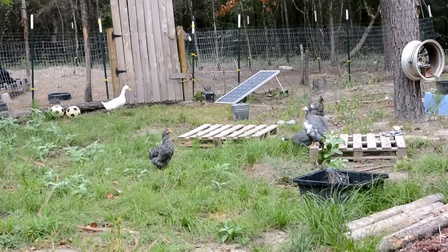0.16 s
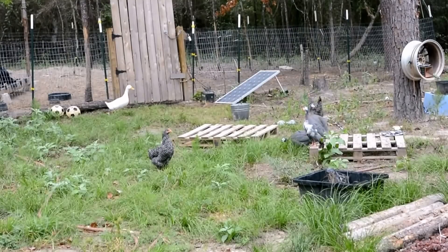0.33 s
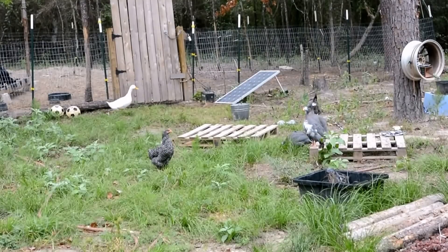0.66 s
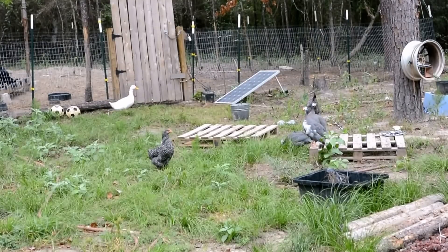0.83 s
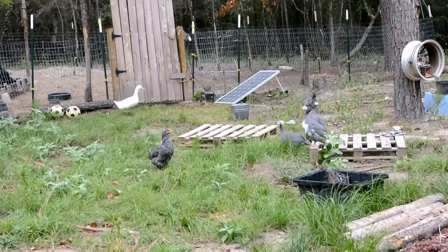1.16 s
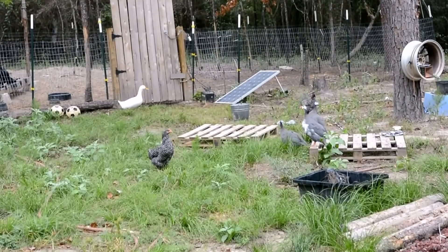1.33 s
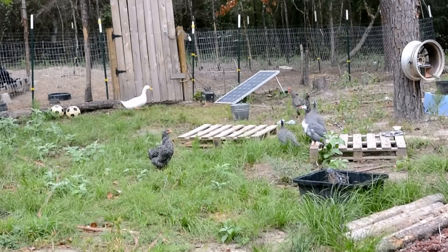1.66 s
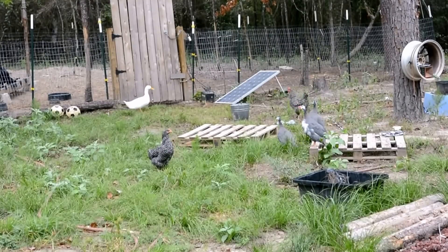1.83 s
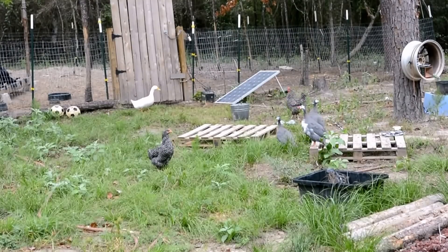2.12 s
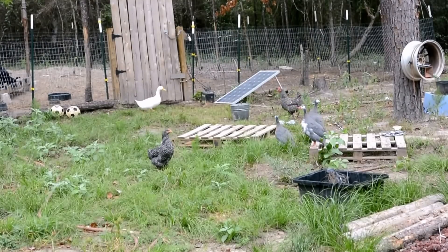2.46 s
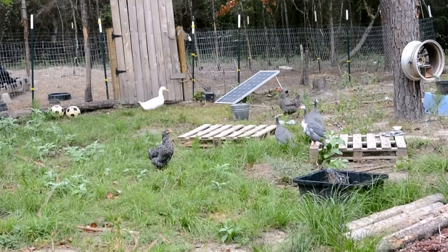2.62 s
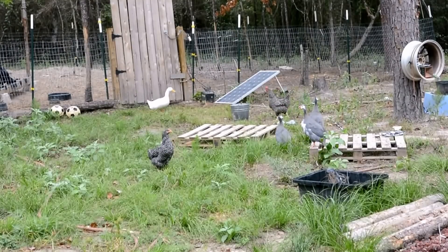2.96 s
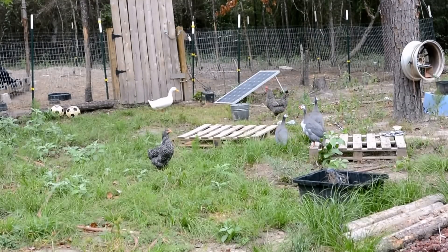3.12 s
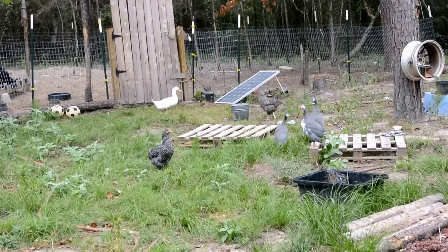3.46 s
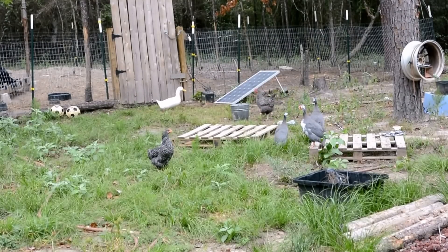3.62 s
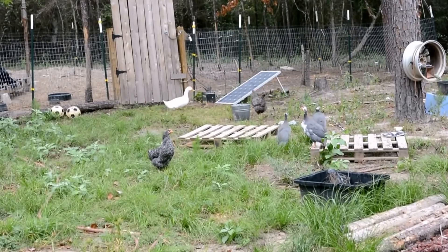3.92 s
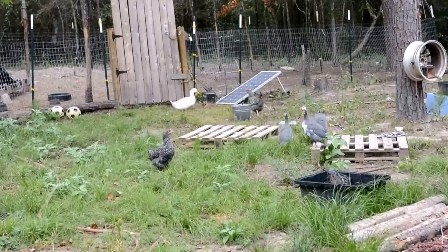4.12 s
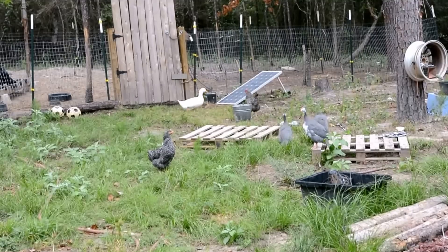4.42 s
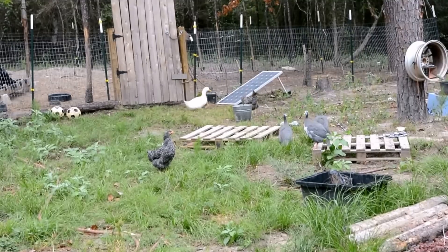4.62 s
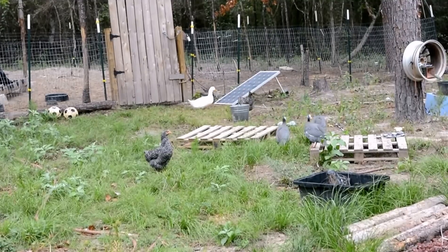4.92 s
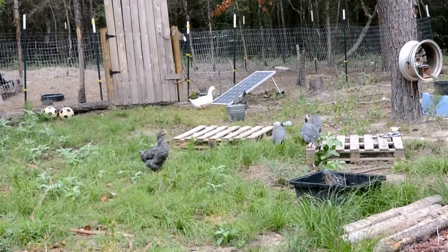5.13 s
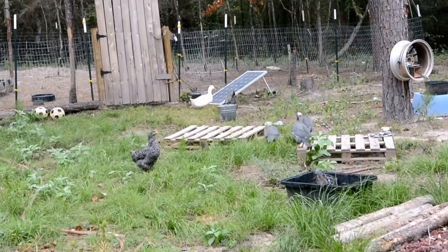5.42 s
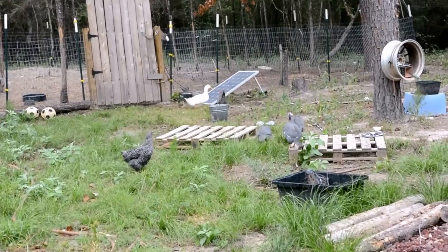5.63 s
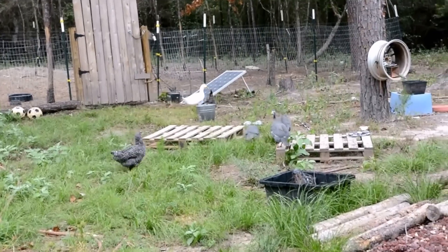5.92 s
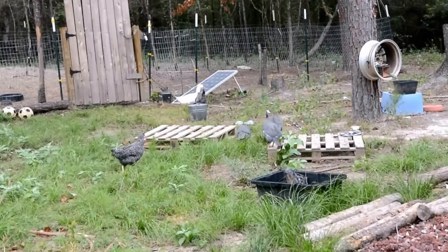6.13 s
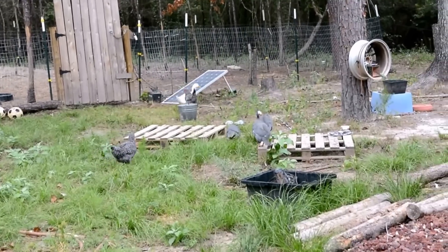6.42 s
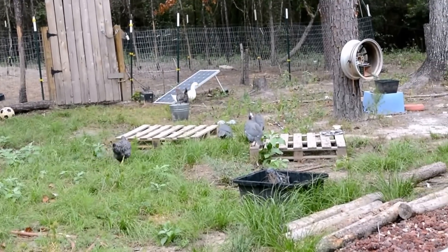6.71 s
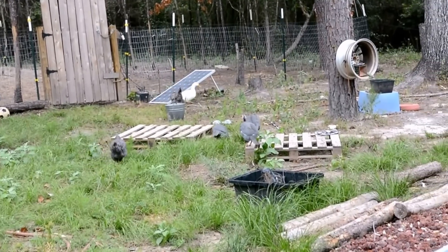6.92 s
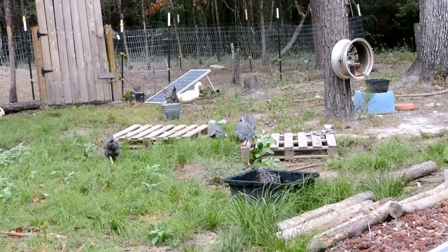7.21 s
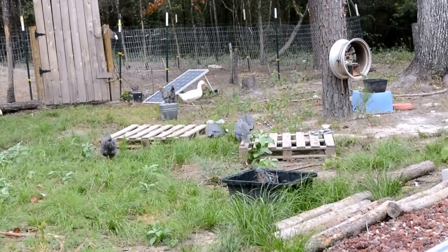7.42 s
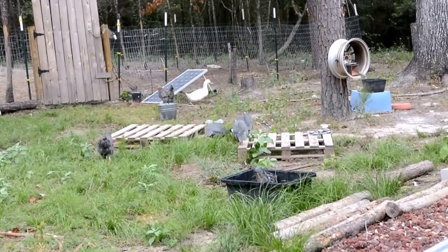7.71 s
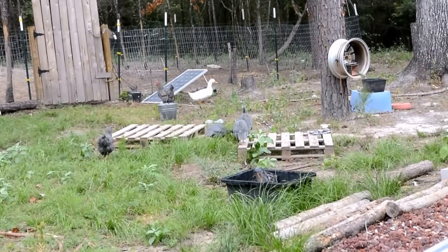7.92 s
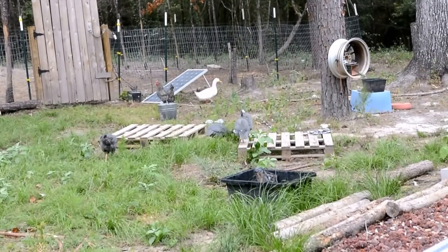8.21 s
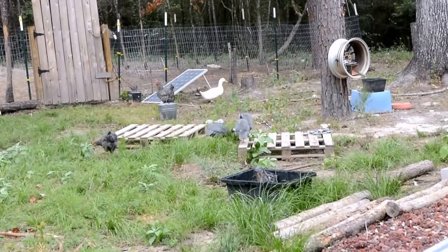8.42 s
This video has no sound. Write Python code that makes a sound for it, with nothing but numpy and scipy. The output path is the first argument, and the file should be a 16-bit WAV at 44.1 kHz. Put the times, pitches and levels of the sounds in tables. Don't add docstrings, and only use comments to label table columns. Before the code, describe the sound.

Close raindrops click and knock unevenly against a thin surface, one strong thud near one second and another at five. Behind them lie gentle patter, faint hiss and occasional high chirps. In the second half a few guinea fowl call from the middle distance: single clipped honks first, then a quick raspy run with squeaky breaks and overlapping replies, ringing briefly among trees. Afterwards the rain continues alone.

```python
import sys
import numpy as np
from scipy import signal
from scipy.fft import rfft, irfft, next_fast_len
from scipy.io import wavfile
from scipy.ndimage import uniform_filter1d

SR = 44100
rng = np.random.default_rng(int(sys.argv[2]) if len(sys.argv) > 2 else 0)


def transcribe(u):
    v = np.clip(np.atleast_2d(u).T, -1, 1)
    q = np.round(v * 32767).astype(np.int16)
    wavfile.write(sys.argv[1], SR, q)


def invert_db(level):
    return 10 ** (np.asarray(level, dtype=float) / 20)


N = 377937
FFT_SIZE = next_fast_len(N + SR)

# start_s, length_s, pitch_hz, level_db
BOOMS = [
    (0.691, 0.063, 574, -45),
    (.93, 0.11, 178, -54),
    (1.243, 0.072, 567, -44),
    (1.32, 0.18, 105, -53),
    (6.285, 0.32, 105, -59.5),
]
# time_s, level_db
WIND = [
    (0.0, -65),
    (7.23, -65),
    (8.09, -57.5),
    (8.57, -57),
]
# freq_hz, density_db
HISS_SPECTRUM = [(29, -44), (50, -20), (85, -11.5), (223, -8), (371, -7.5), (746, 3.5), (822, 1.5),
                 (973, 2.5), (1400, -3.5), (2950, -5), (5670, -13.5), (10400, -11.5), (14900, -18.5),
                 (16000, -5.5)]
# freq_hz, density_db
SIDE_SPECTRUM = [(15, -31), (25, 22), (87, -4.5), (242, -3), (575, -3), (1940, -8), (2690, -7),
                 (13600, -18), (16000, -10)]
# time_s, level_db
PATTER_LEVEL = [(0.0, -51), (0.5, -52.5), (0.97, -49), (1.81, -58), (2.6, -56.5), (3.5, -49.5),
                (4.5, -50.5), (5.5, -43.5), (6.59, -76), (7.3, -53), (8.57, -49.5)]
# start_s, peak_db, ring_hz
THUDS = [(.159, -29.5, 890), (.448, -26, 1650), (.899, -7, 850), (.928, -32, 1190), (1.244, -24, 663),
         (1.414, -21.5, 840), (1.573, -20.5, 1030), (2.061, -30, 751), (2.072, -25, 705),
         (3.341, -32, 2070), (3.392, -24, 980), (3.52, -23, 1100), (3.579, -23.5, 1170), (4.382, -28, 844),
         (4.518, -50, 750), (4.637, -26.5, 1000), (5.038, -12, 890), (5.289, -25.5, 680),
         (5.353, -20, 1040), (5.439, -23, 900), (5.648, -18.5, 1060), (5.851, -20, 990), (6.577, -20, 1170),
         (6.991, -25, 1130), (7.146, -26, 745), (7.307, -22, 1024), (7.596, -30, 1190), (7.674, -19, 1330),
         (7.998, -26.5, 1340), (8.291, -28.5, 1060)]
# start_s, peak_db, ring_hz
TAPS = [(.197, -22.5, 1310), (.608, -22, 890), (.638, -28, 1110), (.905, -24, 1010), (.956, -29.5, 606),
        (1.126, -27.5, 960), (1.17, -26.5, 1210), (1.439, -30, 991), (1.495, -28, 746), (2.072, -28, 1640),
        (.799, -27, 860), (2.744, -22, 795), (2.974, -28, 1020), (3.141, -22.5, 1670), (3.177, -27.5, 1310),
        (3.409, -31.5, 789), (3.632, -27, 1230), (3.995, -17, 810), (4.468, -28, 826), (4.816, -26, 850),
        (4.851, -33, 740), (5.49, -34.5, 1010), (5.752, -24.5, 704), (7.362, -25, 945),
        (7.797, -26.5, 1150), (7.929, -15, 910), (8.263, -37, 969), (8.344, -46, 1020), (8.453, -26.5, 940),
        (.219, -27.5, 696)]
# start_s, peak_db, ring_hz
TICKS = [(.119, -29.5, 654), (.345, -27, 680), (.617, -33, 1500), (.683, -30, 553), (.806, -25, 1300),
         (1.029, -25.5, 1020), (1.069, -32, 775), (1.771, -33.5, 760), (2.408, -32, 1790),
         (2.827, -32.5, 800), (2.897, -24, 657), (3.039, -32, 1140), (3.115, -30, 1000), (3.129, -28, 670),
         (3.241, -22, 800), (3.341, -30, 1990), (3.491, -36, 750), (4.027, -21, 980), (4.178, -29.5, 791),
         (6.148, -26.5, 820), (6.738, -46, 1060), (7.589, -29, 1510), (7.74, -30, 1300),
         (8.083, -27.5, 832), (8.229, -31, 1140), (8.384, -21.5, 821)]
# start_s, peak_db, ring_hz
LIGHT_EARLY = [(0.0276, -36, 1090), (0.0633, -33, 1000), (0.0987, -24, 1160), (0.1715, -36, 1000),
               (0.2327, -19, 990), (0.2444, -21, 1060), (0.2867, -26, 1420), (0.32, -27, 1140),
               (0.3985, -31, 1070), (0.4335, -24, 1200), (0.5382, -33, 1070), (0.674, -16, 1290),
               (0.7856, -33, 1020), (0.8404, -33, 1030), (0.878, -19, 1020), (0.9717, -21, 1040),
               (0.9844, -32, 1060), (1.0014, -27, 1110), (1.133, -23, 1950), (1.2052, -31, 1160),
               (1.31, -31, 1200), (1.4855, -18, 3810), (1.6154, -33, 1000), (1.6412, -31, 1340),
               (1.6721, -35, 1170), (1.697, -33, 1460), (1.7524, -31, 1030), (1.8075, -28, 1000),
               (1.8467, -24, 2620), (1.8993, -26, 1160), (1.9244, -31, 1010), (1.955, -25, 1140),
               (1.9644, -34, 1000), (1.9844, -32, 1080), (2.0984, -32, 1050), (2.1415, -21, 1850),
               (2.2064, -24, 1140), (2.2298, -23.5, 1000), (2.2544, -36, 2300), (2.2714, -34, 1010),
               (2.3226, -31, 1000), (2.4204, -31, 1340), (2.4304, -26, 1730), (2.4584, -37, 1070),
               (2.6104, -35, 1140), (2.6264, -27, 1000), (2.6404, -37, 1700), (2.738, -19, 1090),
               (2.7714, -34, 1830), (2.7911, -33, 1060), (3.019, -29, 2720), (3.1622, -29, 1260),
               (3.269, -20, 1010), (3.331, -23, 1010), (3.4444, -35, 1010), (3.5898, -19, 1300),
               (3.6526, -28, 1050), (3.6754, -28, 1210)]
# start_s, peak_db, ring_hz
LIGHT_LATE = [(3.862, -23, 1090), (3.967, -21, 923), (4.196, -24, 972), (4.331, -35, 864),
              (4.417, -30, 694), (4.568, -35, 813), (4.647, -30, 1180), (4.706, -26, 988),
              (4.895, -26, 891), (5.015, -16, 1140), (5.066, -25, 1290), (5.084, -36, 764),
              (5.244, -35, 1200), (5.609, -34, 816), (5.715, -31, 1410), (5.938, -31, 1430),
              (6.227, -17.5, 1070), (6.837, -23, 875), (7.026, -21, 1440), (7.19, -30, 1080),
              (7.349, -31, 891), (7.43, -31, 1250), (7.468, -25, 958), (7.563, -41, 641),
              (7.647, -25, 1370), (7.76, -41, 1140), (7.868, -29, 875), (8.019, -40, 1200),
              (8.019, -25, 856), (8.127, -25, 993), (8.201, -36, 1190), (8.4, -25, 1250),
              (8.412, -38, 1530), (8.41, -18, 724), (8.474, -29, 810), (8.552, -38, 689)]
# freq_hz, t60_s
WOOD_T60 = [(1000, 0.4), (2100, 0.66), (3000, 0.85), (5000, 0.99), (12000, 0.49)]
# start_s, length_s, start_hz, end_hz, level_db
CHIRPS = [(.09, 0.019, 8500, 8800, -57), (0.144, 0.042, 8700, 8700, -53), (0.201, 0.036, 6870, 8560, -33.5),
          (0.303, 0.041, 6500, 8370, -48), (1.47, 0.045, 3510, 3920, -41.5), (1.691, 0.05, 6300, 8420, -47),
          (2.159, 0.038, 6400, 8920, -36), (2.859, 0.031, 2700, 4040, -48.5),
          (2.913, 0.036, 6400, 8000, -49), (2.788, 0.026, 7450, 7150, -56), (2.966, 0.025, 7300, 7550, -55),
          (3.036, 0.026, 2586, 3570, -40.5), (3.041, .03, 3027, 4350, -48), (3.249, 0.023, 7450, 8750, -46),
          (4.552, 0.024, 2575, 3900, -38), (6.324, 0.045, 6600, 8900, -38), (7.312, 0.035, 6410, 7700, -53),
          (7.413, 0.021, 6650, 7600, -53), (7.88, 0.038, 8300, 9100, -55), (8.063, 0.045, 6540, 8900, -37)]
NOTES = { "clear": [(3.803, 0.037, -26.5, 980, 1), (4.02, 0.045, -18.5, 991.7, -6.5),
         (4.21, 0.055, -16.5, 987, 0.5), (4.732, 0.048, -20, 1003, 2), (5.136, 0.062, -17, 1001, -4)],
         "harsh": [(5.306, 0.071, -17, 1044, 2), (5.49, 0.074, -16, 1047, 4),
         (5.666, 0.083, -15.5, 1045, 6.5), (5.857, 0.078, -15, 1050, 10.5), (6.006, 0.069, -13, 1034, 3.5)],
         "breaking": [(4.957, 0.068, -24, 999, 1)], "falling": [(6.243, 0.079, -16.5, 1064, 3.5)],
         "sliding": [(6.47, 0.088, -15.5, 1074, 2)], "hoarse": [(6.733, 0.089, -17, 1055, 17),
         (6.947, 0.079, -19, 1056, 13)], "trailing": [(5.197, 0.047, -28, 1017, 6.5),
         (6.07, .055, -25, 1007, 4)], "answer": [(6.16, 0.05, -27, 1167, -2),
         (6.362, 0.045, -21.5, 1188, 0), (6.564, 0.0475, -22.5, 1060, 21)], }
VOICING = {"clear": (0.0084, 55, 0.38, 0.016, 0.025), "harsh": (0.0078, 10, 0.29, 1.5, 0.043),
           "hoarse": (0.0077, 45, 1, 1.13, 0.034), "falling": (0.02, 5.4, 0.12, 1.1, 0.167),
           "sliding": (0.027, 16, 0.47, 0.99, 0.095), "breaking": (0.015, 16, 0.82, 0.37, 0.037),
           "trailing": (.003, 0.47, 0.68, 1.32, 0.026), "answer": (0.022, 26, 0.85, 2, 0.068)}
CHAOS = {"clear": .21, "harsh": .45, "hoarse": .36, "falling": .24, "sliding": .3, "breaking": .62,
         "trailing": .48, "answer": .45}
CLIMB = {"clear": 0.0051, "harsh": -0.0084, "hoarse": 0.014, "falling": .04, "sliding": -0.012, "breaking":
         0.0075, "trailing": -0.017, "answer": -.03}
CORE_MULTIPLES = (1 / 3, 1, 4 / 3, 2, 8 / 3, 3, 4)
CORE_DB = {"clear": (-48, -20, -40, -28, -30, -10.5, -29.5),
           "harsh": (-37.5, -40, -15.5, -38, -31, -40, -38), "hoarse": (-56, -14, -18, -8.5, -25, -37, -42),
           "falling": (-56, -14, -40, -6.5, -26, -19, -28), "sliding": (-58, -19, -26, -9, -14, -20, -32),
           "breaking": (-48, -12, -19, -19, -20, -16, -35), "trailing": (-48, -40, -25, -32, -32, -25, -35),
           "answer": (-53, -26, -35, -8.5, -26, -20, -35)}
# freq_hz, density_db
THROAT_CLEAR = [(410, -36), (700, -17), (958, -6), (1280, 5.5), (1460, 3.5), (1920, 2.5), (2990, -2),
                (3410, -6.5), (3990, -4.5), (5540, -25.5), (7490, -21), (10700, -19.5), (16000, -50)]
# freq_hz, density_db
THROAT_MID = [(410, -77), (700, -24.5), (1640, 1), (2020, -5.5), (2160, -8.5), (2490, 1), (2960, 1.5),
              (5400, -15), (6320, -23.5), (7290, -20.5), (8760, -21), (10800, -15), (16000, -32)]
# freq_hz, density_db
THROAT_WIDE = [(190, -26), (320, -47), (897, -13.5), (1070, 0), (1190, -4), (1440, 1), (1540, -1),
               (2560, -3), (3380, -3.5), (3610, -19), (3920, -0.5), (6190, -32.5), (10300, -27),
               (16000, -49)]
# freq_hz, width_hz, clear_db, mid_db, wide_db
WINDPIPE = [(1060, 110, 8, -17.5, -4), (1444, 89, 6, 3.5, 8.5), (1650, 120, -6.5, -7, 18.5),
            (2106, 120, 14.5, 0.5, -17), (2320, 250, 6, 5, 13), (2750, 200, 14, 3.5, 0),
            (3165, 130, 9.5, -7.5, -14), (3360, 170, 15.5, 0.5, 21), (3836, 136, 11, 6.5, 3.5),
            (4690, 400, 8, 5, 1.5), (5630, 280, 12, 1.5, 14.5)]
# start_s, length_s, start_hz, level_db, second_partial_db
SQUEAKS = [(4.02, 0.015, 1566, -29.5, 1.5), (4.732, 0.0081, 1694, -31, 2), (5.843, 0.017, 3820, -26.5, -35),
           (5.864, 0.019, 1520, -20, -2), (5.14, 0.011, 1410, -41, 19.5), (5.491, 0.011, 1465, -25.5, 0),
           (5.976, 0.033, 1575, -23.5, 5), (6.024, 0.074, 1627, -26.5, -1.5),
           (6.173, 0.017, 1740, -29, 2.5), (6.368, 0.02, 1748, -26, 1), (6.462, 0.011, 1664, -30.5, 5),
           (6.472, .018, 1210, -34, 1), (6.571, 0.016, 1710, -33, 9.5)]


def rms_one(x):
    return x / np.sqrt(np.mean(x ** 2) + 1e-20)


def at_hz(points, hz):
    points_hz, value = np.transpose(points)
    return np.interp(np.log(np.maximum(hz, 1)), np.log(points_hz), value)


def level_curve(rows):
    time_s, level_db = np.transpose(rows)
    return invert_db(np.interp(np.arange(N) / SR, time_s, level_db))


def butter(x, order, hz, kind="low"):
    return signal.sosfilt(signal.butter(order, hz, kind, fs=SR, output="sos"), x)


def causal(x, db):
    cepstrum = irfft(db * np.log(10) / 20, len(x))
    cepstrum[1:len(x) // 2] *= 2
    cepstrum[len(x) // 2 + 1:] = 0
    return irfft(rfft(x) * np.exp(rfft(cepstrum)), len(x))


def coloured(spectrum):
    hz = np.arange(FFT_SIZE // 2 + 1) * SR / FFT_SIZE
    white = rfft(rng.standard_normal(FFT_SIZE))
    return irfft(white * invert_db(at_hz(spectrum, hz)), FFT_SIZE)[:N]


def add(out, start_s, piece):
    i = max(round(start_s * SR), 0)
    out[i:i + len(piece)] += piece[:N - i]


def far_rumble():
    waver = rms_one(uniform_filter1d(rng.standard_normal(N), size=3000))
    hum_hz, hum_db = 71, -67
    phase = 2 * np.pi * hum_hz * np.arange(N) / SR + 0.85 * waver[::-1]
    out = invert_db(hum_db) * (1 + 0.31 * waver) * np.sin(phase)
    for start_s, length_s, hz, db in BOOMS:
        u = np.linspace(0, 1, round(length_s * SR))
        envelope = np.sin(np.pi * u ** 0.84)
        add(out, start_s, invert_db(db) * envelope * np.sin(2 * np.pi * hz * length_s * u))
    return out


def wind():
    return rms_one(butter(rng.standard_normal(N), 2, [20, 45], "band")) * level_curve(WIND)


def insects(hz, width_hz, db):
    band = butter(rng.standard_normal(N), 2, [hz - width_hz, hz + width_hz], "band")
    return invert_db(db) * rms_one(band)


def rain_hiss():
    hiss = rms_one(coloured(HISS_SPECTRUM))
    low = butter(hiss, 2, 4500)
    patches = uniform_filter1d(uniform_filter1d(hiss[::-1] ** 2 - 1, size=900), size=900)
    lull = invert_db(1.6 * rms_one(patches))
    return invert_db(-43) * (hiss + low * (lull - 1))


def drop(ring_hz, tick_db, cycles, luck):
    t = np.arange(len(luck)) / SR
    decay = invert_db(-60 * t * ring_hz / cycles)
    swing = -np.sin(2 * np.pi * ring_hz * t + 1.69) * decay * (1 - np.exp(-t / 0.00009))
    tick = butter(luck * np.exp(-t / 0.00025) / np.std(luck[:12]), 2, 8000)
    splash = signal.lfilter([0.5], [1, -0.7], luck[::-1]) * np.exp(-t / 0.004)
    return butter(swing + invert_db(tick_db + 10) * tick + invert_db(-20.5) * splash, 2, 330, "high")


def patter(per_s, spread_db):
    gust = invert_db(3 * rms_one(uniform_filter1d(rng.standard_normal(N), size=2500)))
    size_gain = invert_db(spread_db * np.minimum(rng.exponential(1, N), 2.4))
    born = (rng.random(N) < gust * per_s / SR) * size_gain
    dealt = rng.integers(0, 14, N)
    taps = np.zeros(N)
    for k, ring_hz in enumerate(np.geomspace(560, 3200, 14)):
        one = drop(ring_hz, -17.5, 2.17, rng.standard_normal(500)) * (800 / max(ring_hz, 800)) ** 0.043
        taps += signal.fftconvolve(born * (dealt == k), one)[:N]
    return rms_one(taps) * level_curve(PATTER_LEVEL)


def near_drops():
    out = np.zeros(N)
    # table, tick_db, gain_db, ring cycles, delay_s
    groups = ((THUDS, -28, 8.5, 3.5, 0.0024), (TAPS, -18, 8.5, 3.5, 0.0024), (TICKS, -10, 8.5, 3.5, 0.0024),
              (LIGHT_EARLY, -17.5, 1.5, 2.6, 0.0014), (LIGHT_LATE, -17.5, 1.5, 2.6, 0.0014))
    for table, tick_db, gain_db, cycles, delay_s in groups:
        for start_s, db, ring_hz in table:
            piece = drop(ring_hz, tick_db, cycles, rng.standard_normal(900))
            add(out, start_s + delay_s, invert_db(db + gain_db) * piece)
    return out


def wood(x, first_s, slap_db):
    t = np.arange(SR) / SR
    response = np.zeros(SR)
    edges_hz = 300 * 2 ** np.arange(0, 6.1, 0.75)
    for low, high in zip(edges_hz, edges_hz[1:]):
        band = butter(rng.standard_normal(SR), 2, [low, high], "band")
        response += band * invert_db(-60 * t / at_hz(WOOD_T60, np.sqrt(low * high)))
    response *= np.clip(t / first_s, 0, 1) * (1 + invert_db(slap_db) * np.exp(-t / 0.021))
    return signal.fftconvolve(x, response / np.sqrt(np.sum(response ** 2)))[:N]


def whistle(length_s, start_hz, end_hz, bend, partials_db, wobble):
    u = np.linspace(0, 1, max(round(length_s * SR), 8))
    shake = 1 + wobble * uniform_filter1d(rng.standard_normal(4096), size=64)[:len(u)]
    glide = u ** bend if bend > 1 else 1 - (1 - u) ** (1 / bend)
    phase = 2 * np.pi * np.cumsum((start_hz + (end_hz - start_hz) * glide) * shake) / SR
    tone = sum(invert_db(db) * np.sin((k + 1) * phase) for k, db in enumerate(partials_db))
    return np.sqrt(2) * tone * np.sin(np.pi * u ** 1.46) ** 0.38


def small_birds():
    out = np.zeros(N)
    for start_s, length_s, start_hz, end_hz, db in CHIRPS:
        bend = 2.5 if start_hz < 3300 else 0.6
        add(out, start_s, invert_db(db) * whistle(length_s, start_hz, end_hz, bend, [0], wobble=0.1))
    return out


def syrinx_pulses(length_s, chaos, climb, pulse_hz, accent, droop):
    cycle = np.arange(140)
    jitter, offbeat, push = rng.standard_normal((3, 140))
    period = 1 + droop * np.clip((cycle / pulse_hz - length_s + 0.03616) / 0.0338, 0, 2) ** 2
    wander = rms_one(uniform_filter1d(jitter[::-1], size=14))
    period *= 1 + 0.025 * chaos * wander
    period /= 1 + climb * (cycle / pulse_hz / length_s - 0.5)
    beats = SR / pulse_hz * np.cumsum(period * (1 + 0.03 * chaos * jitter))
    accent = accent * np.clip(1 + 1.2 * chaos * wander[::-1], 0, 1.3)
    limp = 0.057 * accent * np.array([0, 0.9, -0.5])[cycle % 3]
    times = beats + SR / pulse_hz * (limp + 0.08 * chaos * offbeat)
    strength = 1 - accent * np.array([0, 0.7, 0.45])[cycle % 3]
    return beats, times, strength * (1 + np.tanh(0.8 * chaos * push))


def vocal_tract_db(hz, gape, chaos):
    weights = np.clip(1 - abs(np.clip(gape, 0, 1.5) - np.arange(3)), 0, 1)
    response = sum(w * at_hz(table, hz) for w, table in zip(weights, (THROAT_CLEAR, THROAT_MID, THROAT_WIDE)))
    for peak_hz, width_hz, *lift_db in WINDPIPE:
        more, shift = rng.standard_normal(2)
        offset = (hz - peak_hz * (1 + 0.0089 * shift)) / width_hz
        response = response + (np.dot(weights, lift_db) + 4.6 * chaos * more) / (1 + (2 * offset) ** 2)
    return response


def steady_core(voice, beats, core_db, chaos):
    i = np.arange(len(voice))
    smooth_beats = uniform_filter1d(beats, size=9, mode="nearest")
    turn = 2 * np.pi * np.interp(i, smooth_beats, np.arange(len(beats)))
    core = np.zeros(len(voice))
    for k, db in zip(CORE_MULTIPLES, core_db):
        waver = np.interp(i / SR, np.arange(40) / 200, rng.standard_normal(40))
        flutter = 1 + 1.3 * chaos * np.sqrt(k) * waver
        phase = np.angle(voice @ np.exp(-1j * k * turn))
        core += np.sqrt(2) * invert_db(db) * flutter * np.cos(k * turn + phase)
    return core


def note(rows, chaos, core_db, climb, pulse_hz, accent, gape, droop):
    size = 6144
    time_s, db = np.transpose(rows)
    length_s = time_s[-1]
    count = round(length_s * SR)
    t = np.arange(count) / SR
    beats, times, strength = syrinx_pulses(length_s, chaos, climb, pulse_hz, accent, droop)

    hz = np.arange(size // 2 + 1) * SR / size
    keep = (times > 0) & (times < count + 50)
    pulses = irfft(np.exp(-2j * np.pi * np.outer(hz / SR, times[keep])) @ strength[keep], size)
    breath = rng.standard_normal(size) * np.interp(np.arange(size), np.sort(times), strength)
    bright = np.clip(np.log2(np.maximum(hz, 1) / 3000), 0, 2)
    breath = irfft(rfft(rms_one(breath)) * (0.9 * chaos + 0.7 * bright), size)
    source = pulses / np.std(pulses[:count]) + breath
    voice = causal(source, vocal_tract_db(hz, gape, chaos))[:count]

    level_db = np.interp(t, time_s, db)
    treble = butter(voice, 1, 2300, "high")
    fading = np.arange(count) > np.argmax(level_db)
    dull = 1 - invert_db(4.4 * fading * (level_db - level_db.max()))
    rasp = rms_one(voice - dull * treble)

    attack_s, release_s = 0.0076, 0.009
    edge = np.clip(np.minimum(t / attack_s, (length_s - t) / release_s), 0, 1)
    return (rasp + steady_core(voice, beats, core_db, chaos)) * invert_db(level_db) * edge


def fowl():
    out = np.zeros(N)
    for kind, notes in NOTES.items():
        rise_s, onset_db, *voice = VOICING[kind]
        for start_s, length_s, db, pulse_hz, fade_db in notes:
            hold_s = 0.57 * length_s
            rows = [(0, db - onset_db), (min(rise_s, hold_s / 1.1), db - 3), (hold_s, db), (length_s, db - fade_db)]
            add(out, start_s, note(rows, CHAOS[kind], CORE_DB[kind], CLIMB[kind], pulse_hz, *voice))
    for start_s, length_s, hz, db, second_db in SQUEAKS:
        partials_db = [0, second_db, second_db - 10, second_db - 20]
        add(out, start_s, invert_db(db) * whistle(length_s, hz, hz - 59, 0.85, partials_db, wobble=0.19))
    return out


def scene():
    background = far_rumble() + invert_db(-5.5) * wind() + insects(10230, 150, db=-65.5)
    rain = rain_hiss() + invert_db(3) * patter(per_s=400, spread_db=5)
    drops, birds, calls = near_drops(), small_birds(), fowl()
    to_wood = invert_db(-6) * butter(calls, 2, 1400, "high") + birds + invert_db(-12) * drops
    echo = wood(to_wood, first_s=0.0017, slap_db=9)
    mid = background + rain + drops + echo + birds + calls
    side = invert_db(-51.5) * rms_one(coloured(SIDE_SPECTRUM))
    return np.array([mid + side, mid - side])


def roll_off(x):
    return signal.sosfilt(signal.butter(12, 16680, fs=SR, output="sos"), x)


def record(dry):
    rounded = np.tanh(dry)
    mix = signal.sosfilt(signal.cheby2(12, 60, 16350, fs=SR, output="sos"), rounded)
    return roll_off(mix)


dry = scene()
out = record(dry)
transcribe(out)
```